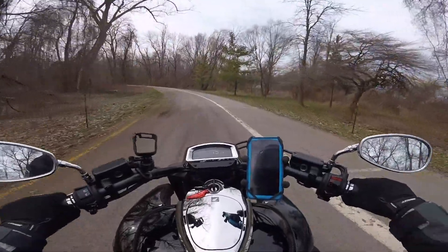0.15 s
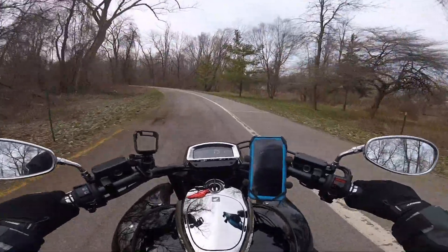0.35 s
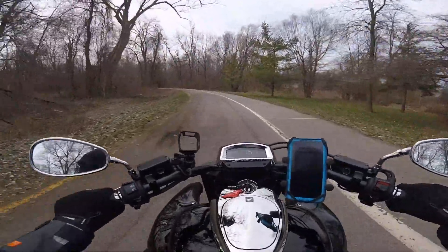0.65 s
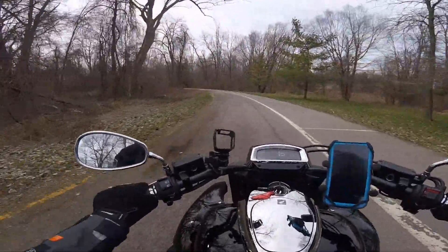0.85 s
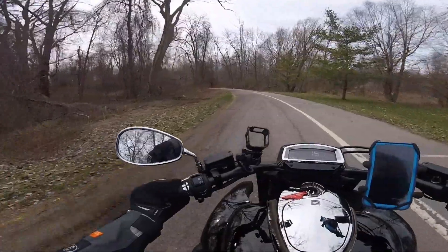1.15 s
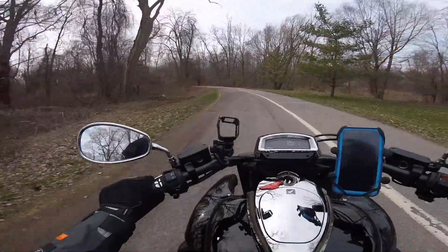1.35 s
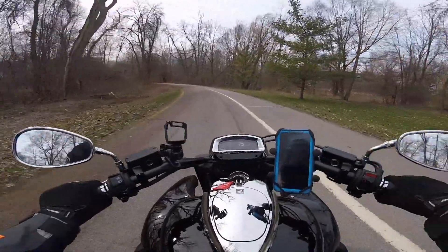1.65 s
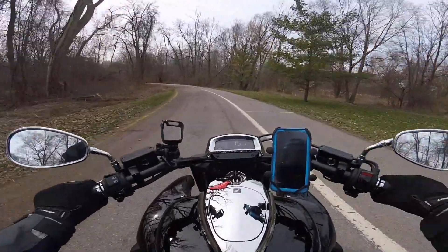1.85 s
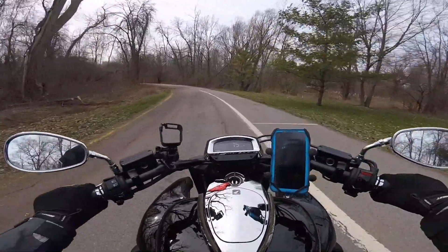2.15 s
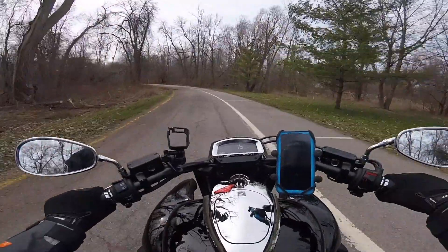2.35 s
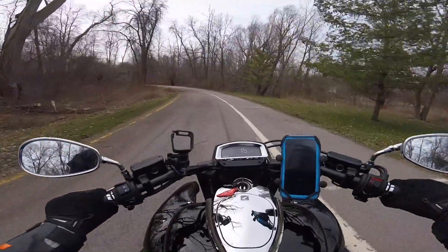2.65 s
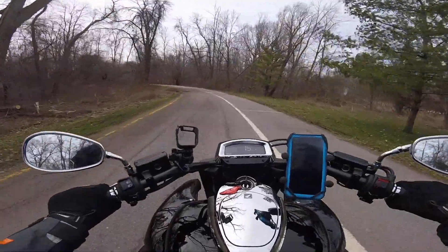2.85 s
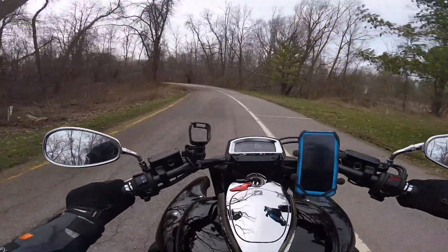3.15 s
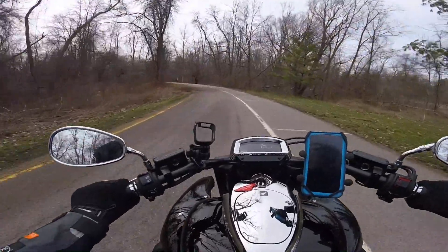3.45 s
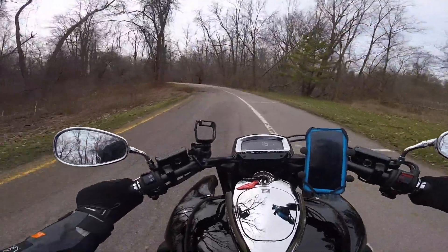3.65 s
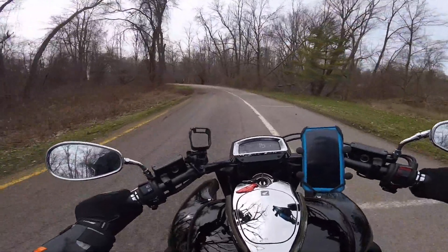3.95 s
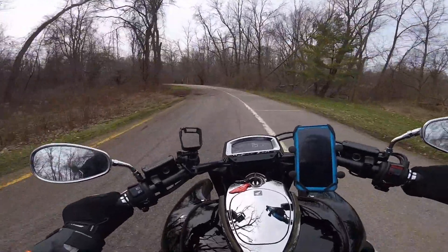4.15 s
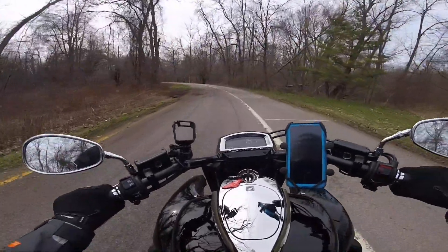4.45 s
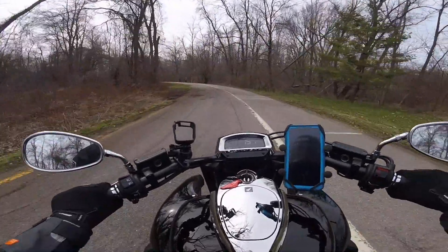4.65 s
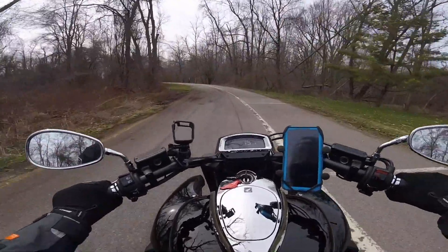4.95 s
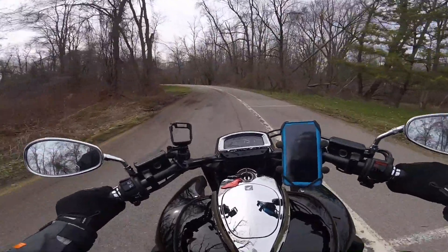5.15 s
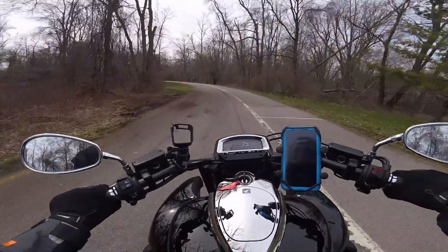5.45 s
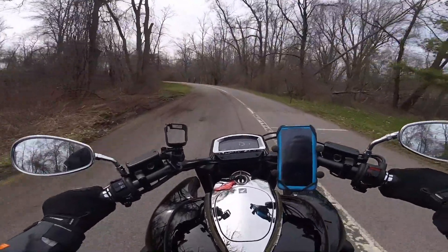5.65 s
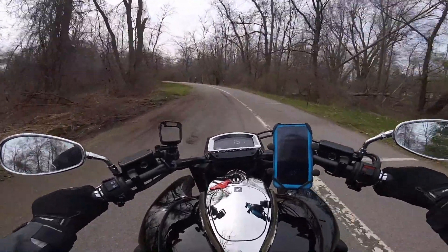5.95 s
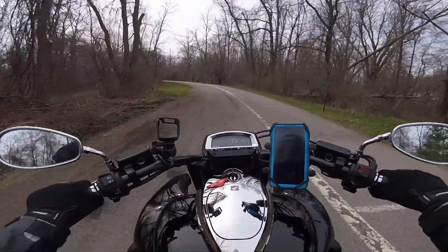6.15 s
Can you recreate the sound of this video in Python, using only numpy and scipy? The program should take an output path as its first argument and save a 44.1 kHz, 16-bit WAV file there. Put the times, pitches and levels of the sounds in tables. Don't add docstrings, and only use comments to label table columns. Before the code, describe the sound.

Low wind buffets and thuds heavily against a microphone on a moving motorcycle while its engine hums steadily underneath with a faint whine.

```python
import sys
import numpy as np
from scipy import signal
from scipy.fft import rfft, irfft, next_fast_len
from scipy.io import wavfile

SR = 44100
rng = np.random.default_rng(int(sys.argv[2]) if len(sys.argv) > 2 else 0)


def store_wav(level_fs):
    pcm = np.round(np.clip(np.atleast_2d(level_fs), -1, 1) * 32767)
    wavfile.write(sys.argv[1], SR, pcm.T.astype(np.int16))


def gain_from_decibels(decibels):
    exponent = np.asarray(decibels, float) / 20
    return 10 ** exponent


N = 278712

# (time [s], level [dB])
WIND_SPEED = [(0, -55.5), (.45, -56), (.75, -60.5), (1.1, -55.3), (1.65, -55.2), (2.2, -55), (2.75, -55.5),
              (3.4, -50), (3.75, -51), (4.2, -50.5), (4.7, -52.5), (5.0, -54), (5.28, -58), (5.55, -53.5),
              (6.05, -53), (6.32, -51.5)]
CALM_DB = [-34.5, -39, -53.5, -81]
WIND_SHARE = [0.45, 0.76, 0.63, 0.083]
# (time [s], lift [dB])
HEAVES = [(.1, 7), (.48, 9), (.77, 1), (1.19, 12), (1.52, 4.5), (1.83, 10), (2.18, 9), (2.52, 14.5),
          (2.84, 8), (3.05, 10), (3.35, 9), (3.73, 9), (4.08, 2.5), (4.48, 9.5), (4.76, 2), (5.31, 9.5),
          (5.61, 0.5), (5.83, 3), (6.2, 0)]
# (time [s], thud lift [dB], rush lift [dB])
GUSTS = [(0, 4.5, -1), (.46, 0, 0), (.99, -1.5, -1.5), (1.33, 7, 0), (1.6, 6.5, -2), (1.88, 9.5, -1),
         (2.24, 7, 0), (2.53, 10, 3.5), (2.97, 2.5, 0), (3.18, 6.5, 3), (3.5, 2, -1.5), (3.63, 4, 0),
         (3.9, 8, 2), (3.98, 5, 5.5), (4.1, 2, 1), (4.4, 4, 0.5), (4.62, 7, 1), (4.86, 5.5, -0.8),
         (5.17, 6.5, 2.5), (5.39, 7, 2.5), (5.62, -2.5, -1), (5.76, 3, 1), (5.92, 4, 0), (6.28, 3, -2.5)]
# (time [s], lift [dB])
VISOR_TURN = [
    (0, -.3),
    (.45, .5),
    (1.1, 1.5),
    (1.65, -1),
    (2.4, -.2),
    (6.32, .2),
]
# (time [s], lift [dB], half length [s], thump level [dB], thump pitch [Hz])
SLAPS = [(.018, 1.5, 0.0064, -31, 106), (.085, 0, 0.013, -30.5, 104), (0.494, 3, 0.015, -38, 42),
         (0.526, -0.5, 0.024, -32, 43), (1.735, -5, 0.008, -29, 112), (1.852, -4.5, 0.015, -26, 61),
         (2.127, 0, 0.025, -27, 45.3), (2.19, 2.5, 0.016, -33, 56), (2.307, 2.5, 0.024, -35.5, 86),
         (2.453, 4, 0.018, -25, 63.3), (2.528, -3.5, 0.0046, -24.5, 65), (2.579, 1.5, .012, -29, 30),
         (2.612, 5, 0.0075, -19.5, 49.3), (2.905, -1, 0.013, -39, 45.2), (2.933, 3, 0.01, -34, 110),
         (3.164, 4, 0.02, -45, 200), (3.478, 3.5, 0.029, -35, 42), (3.688, -1, 0.026, -31, 46),
         (3.910, 3.5, 0.0081, -35, 150), (3.919, -2.5, 0.011, -21, 48.2), (3.944, 0, 0.0061, -25.5, 42),
         (3.982, -3.5, 0.0063, -27.5, 55), (4.013, 3.5, .005, -34, 80), (3.992, -0.5, 0.0048, -35, 127),
         (4.061, 11.5, 0.0056, -26, 135), (4.073, -4, 0.013, -22.5, 45), (4.124, -1.5, 0.0093, -34, 181),
         (4.228, 9, 0.015, -29.5, 125), (4.475, 0.5, 0.0076, -28.5, 56), (4.652, 1.5, 0.012, -27.5, 59),
         (5.015, -3.5, 0.018, -37, 125), (5.23, -1.5, 0.015, -31, 106), (5.455, 4.5, 0.012, -32.5, 90),
         (5.582, 6.5, 0.0074, -26.5, 50.6), (5.676, 5, 0.02, -31.5, 51.7), (5.789, 1, 0.0091, -26, 113),
         (5.854, 5, 0.015, -29, 96)]
# (frequency [Hz], level [dB per Hz])
PORT_SPECTRUM = [(2.4, -24), (4, -2), (9, -1), (17, -3.5), (25, -7), (40, -11), (70, -12), (100, -13.5),
                 (140, -18.5), (200, -23), (270, -26)]
# (frequency [Hz], level [dB per Hz])
STREAM_SPECTRUM = [(160, -30), (270, -1), (332, -6), (407, -5), (559, -12.5), (817, -17.5), (1720, -33),
                   (2590, -40), (3390, -48.5), (3790, -47), (6390, -47.5), (11800, -58), (15400, -84),
                   (22000, -120)]
REGIONS_HZ = [20, 110, 550, 4500]
BAND_EDGES_HZ = [4, 45, 250, 280, 1100, 3000, 11500]
TRIM_DB = [-1, -3, -0.1, 0.03]
# (frequency [Hz], flicker [dB])
FLICKER = [(10, .4), (100, .7), (1000, 1.1), (4000, 1), (10000, 1.4)]
# (time [s], four-stroke cycles per second [Hz])
REVS = [
    (0, 17.03),
    (.7, 17.12),
    (1.25, 17.24),
    (1.6, 17.1),
    (3, 17.1),
    (4.5, 17.07),
    (6.32, 17.04),
]
HUM_ORDERS = [3, 6, 7, 9, 10, 12, 18, 49]
# (level [dB], unsteadiness [dB])
HUM = [(-50, 2), (-44.8, 1.2), (-52, 1.5), (-49.5, 1), (-57.5, 2), (-63, 2), (-69, 3), (-76, 1.5)]
WHINE_ORDERS = [26.9, 37, 73, 75, 147.6, 151.5, 220.5, 224.8, 293.8, 368.6, 438]
# (level [dB], line width [Hz], throbs [per cycle], depth of throb [0-1])
WHINE = [(-63.5, 25, 1, 0), (-77, 12, 1, 0), (-84, 5, 2, .5), (-81.5, 5, 2, .5), (-85.5, 15, 1, .5),
         (-99, 18, 1, .5), (-93, 17, 1, .8), (-95.5, 12, 3, .8), (-96.5, 24, 1, .6), (-95, 24, 1, .8),
         (-103, 40, 1, .5)]
# (time [s], lift [dB])
FACING = [
    (0, -4),
    (.3, 1),
    (.8, 3),
    (1.3, 4),
    (1.55, -1),
    (2.3, 1),
    (3.2, 0),
    (4.2, -2),
    (5.2, -2),
    (6.32, -2),
]
# (time [s], peak level [dB], ring
# pitch [Hz], time to fall 60 dB [s], spread of the ring [ratio])
GRIT = [(.670, -71, 7500, .03, 1.3), (.415, -72, 6500, .03, 1.5), (3.11, -70, 6000, .07, 1.4),
        (.78, -72, 9000, .005, 1.25), (1.5534, -68, 8000, .025, 1.4), (1.612, -70, 6500, .025, 1.3),
        (2.545, -71, 7000, .03, 1.25), (3.12, -75, 11500, .03, 1.05), (4.4644, -61, 5250, .01, 1.07),
        (4.7153, -64, 3450, .012, 1.06), (4.7155, -60, 2300, .004, 1.3), (4.7156, -62, 5500, .003, 1.3),
        (4.736, -72, 3800, .01, 1.07), (4.7642, -49, 1250, .008, 1.2), (4.7643, -55, 2100, .004, 1.25),
        (4.7645, -62, 3700, .006, 1.12), (4.7647, -66, 8000, .004, 1.15), (4.7985, -65, 7500, .05, 1.1),
        (4.7995, -71, 10000, .035, 1.12), (4.8005, -70, 4900, .04, 1.1), (5.09, -73, 10500, .012, 1.12),
        (5.8695, -69, 9000, .03, 1.3), (5.8718, -64, 7700, .022, 1.06), (5.8765, -70, 7600, .03, 1.06)]
# (time [s], peak level [dB])
POPS = [(.629, -49), (.818, -47.5), (.893, -55), (1.985, -50), (2.592, -45), (3.134, -51), (3.181, -44),
        (3.439, -58), (3.671, -50), (3.877, -50), (3.915, -40), (3.994, -51), (4.081, -47), (4.129, -50),
        (4.292, -47), (4.476, -48), (4.628, -53), (4.635, -46)]
POP_BAND_HZ = [390, 865]


def in_time(rows):
    s, *columns = np.transpose(rows)
    return [np.interp(np.arange(N) / SR, s, column) for column in columns]


def at_hz(points, hz):
    point_hz, level_db = np.transpose(points)
    return np.interp(np.log(hz), np.log(point_hz), level_db)


def rms_one(x):
    return x / np.sqrt(np.mean(x ** 2) + 1e-30)


def drift(rate):
    r = np.exp(-80 * np.pi * rate / SR)
    noise = rng.standard_normal(N // 40 + 2002)
    slow = signal.lfilter([1], [1, -2 * r, r * r], noise)[2000:]
    return np.interp(np.arange(N) / 40, np.arange(len(slow)), rms_one(slow - slow.mean()))


def swells(rows, half_s):
    s, *lifts = np.transpose(rows)
    bells = np.exp(-.5 * ((np.arange(N) / SR - s[:, None]) / half_s) ** 2)
    return np.array(lifts) @ bells


def turbulence_db():
    wind_db = in_time(WIND_SPEED)[0]
    heave_db, = swells(HEAVES, half_s=0.062)
    thud_db, rush_db = swells(GUSTS, half_s=0.056)
    hiss_db = .45 * rush_db + in_time(VISOR_TURN)[0]
    swing_db = np.outer(WIND_SHARE, wind_db - wind_db.mean())
    return np.array(CALM_DB)[:, None] + swing_db + [heave_db, thud_db, rush_db, hiss_db]


def eddies():
    t = np.arange(N) / SR
    lift_db, thump = np.zeros((2, N))
    for s, db, half_s, thump_db, hz in SLAPS:
        bell = np.exp(-.5 * ((t - s) / half_s) ** 2)
        lift_db += db * bell
        thump -= gain_from_decibels(thump_db) * bell * np.cos(2 * np.pi * hz * (t - s))
    return lift_db, thump


def wind():
    size = next_fast_len(N)
    hz = np.maximum(np.arange(size // 2 + 1) * SR / size, 1)
    low, high = np.array(PORT_SPECTRUM), np.array(STREAM_SPECTRUM[1:])
    high = high + [0, low[-1, 1] - high[0, 1] - 1.5]
    colour = rfft(rng.standard_normal(size)) * gain_from_decibels(at_hz(np.vstack([low, high]), hz))

    edges = BAND_EDGES_HZ
    usual = []
    for lo, hi in [edges[0:2], edges[1:3], edges[3:5], edges[5:7]]:
        in_band = (hz > lo) & (hz < hi)
        usual.append(np.sqrt(2 * np.sum(abs(colour[in_band]) ** 2)) / size)
    gains_db = turbulence_db() - 20 * np.log10(usual)[:, None] + np.array(TRIM_DB)[:, None]
    slaps_db, out = eddies()
    gains_db += np.outer([.8, 1, .5, .1], slaps_db)

    puffs, flutter = drift(20), drift(49)
    for centre_hz in 4 * 2 ** np.arange(0, 12.5, .5):
        window = np.cos(np.pi * np.clip(np.log2(hz / centre_hz), -.5, .5)) ** 2
        place = np.interp(np.log(centre_hz), np.log(REGIONS_HZ), np.arange(4))
        share = np.clip(1 - abs(place - np.arange(4)), 0, 1)
        rough = .6 * puffs + .6 * flutter * (place > 2) + .8 * drift(14)
        level_db = share @ gains_db + at_hz(FLICKER, centre_hz) * rough
        out += gain_from_decibels(level_db) * irfft(colour * window, size)[:N]
    return out


def engine():
    cycle = 2 * np.pi * np.cumsum(in_time(REVS)[0]) / SR
    hum, whine = np.zeros((2, N))
    facing_db = in_time(FACING)[0]
    for order, (db, wobble_db) in zip(HUM_ORDERS, HUM):
        level = gain_from_decibels(db + wobble_db * drift(4))
        phase = order * cycle + .3 * drift(1.5) + rng.uniform(0, 2 * np.pi)
        hum += level * np.sqrt(2) * np.sin(phase)
    for order, (db, width_hz, throbs, depth) in zip(WHINE_ORDERS, WHINE):
        waver = 2 * np.pi * np.cumsum(width_hz * drift(22)) / SR
        throb = 1 + depth * np.cos(throbs * cycle)
        line = (1.2 + .3 * drift(width_hz)) * throb * np.sin(order * cycle + waver)
        alternator_db = facing_db * (140 < order < 160)
        whine += gain_from_decibels(db + .6 * drift(3) + alternator_db) * line
    return hum + whine


def grit():
    out, t = np.zeros(N + 2048), np.arange(2048) / SR
    skids = rng.standard_normal((len(GRIT), 2048))
    for (s, db, hz, t60, spread), skid in zip(GRIT, skids):
        click = 2 * (t == 0) * (t60 < .02)
        contact = gain_from_decibels(-60 * t / t60) * (.3 * skid + click)
        panel = signal.butter(2, [hz / spread, hz * spread], "band", fs=SR, output="sos")
        tick = signal.sosfilt(panel, contact)
        out[round(s * SR):][:2048] += gain_from_decibels(db) * tick / abs(tick).max()
    return out[:N]


def pops():
    out, t = np.zeros(N + 4096), np.arange(4096) / SR
    rim = signal.butter(2, POP_BAND_HZ, "band", fs=SR, output="sos")
    fade = gain_from_decibels(-60 * t / 0.026)
    for (s, db), air in zip(POPS, rng.standard_normal((len(POPS), 4096))):
        burst = (air + 12 * (t == 0)) * fade
        puff = signal.sosfilt(rim, signal.sosfilt(rim, burst))
        out[round(s * SR):][:4096] += gain_from_decibels(db) * puff / abs(puff).max()
    return out[:N]


def scene():
    return (wind() + engine() + grit() + pops())[None]


def top_cut(x):
    return signal.sosfilt(signal.butter(12, 11990, fs=SR, output="sos"), x)


def record(dry):
    limit = .17
    rounded = limit * np.tanh(dry / limit)
    return top_cut(rounded)


dry = scene()
out = record(dry)
store_wav(out)
```